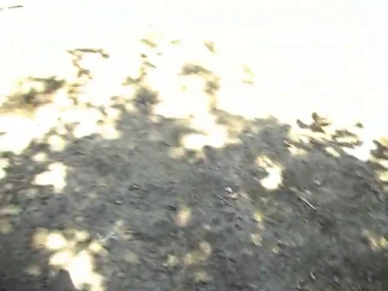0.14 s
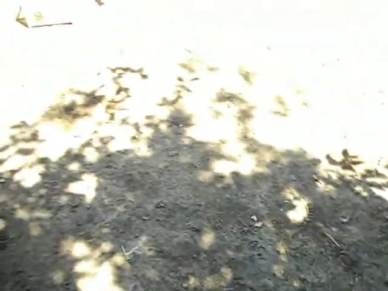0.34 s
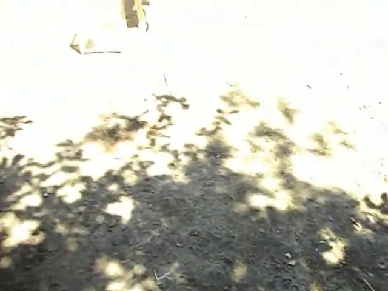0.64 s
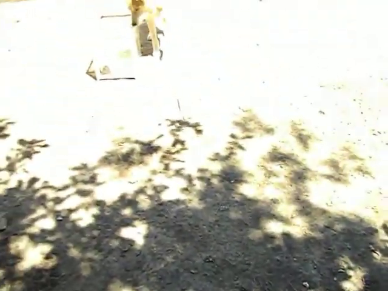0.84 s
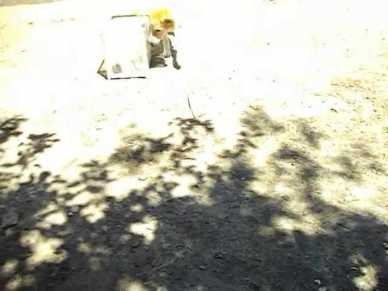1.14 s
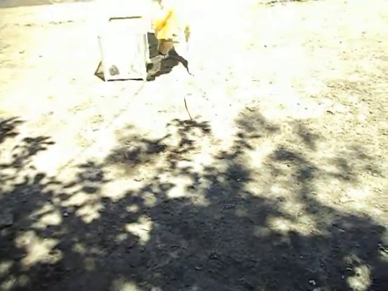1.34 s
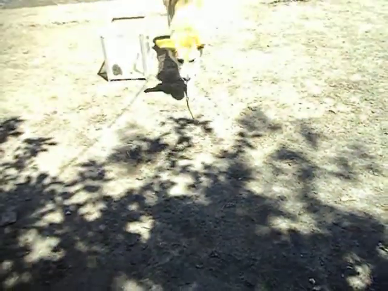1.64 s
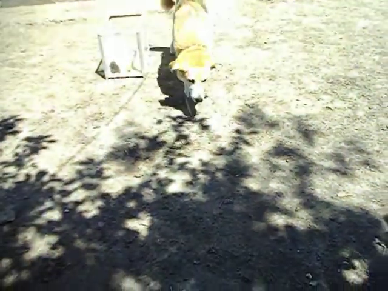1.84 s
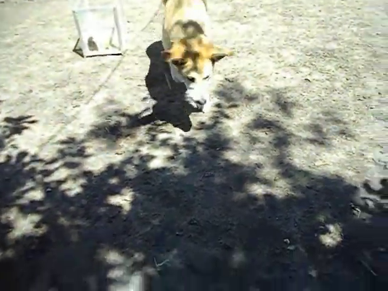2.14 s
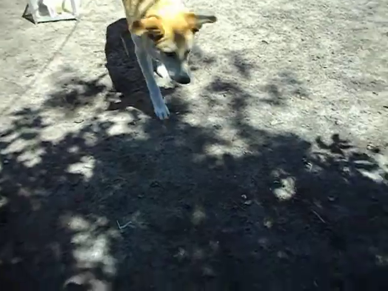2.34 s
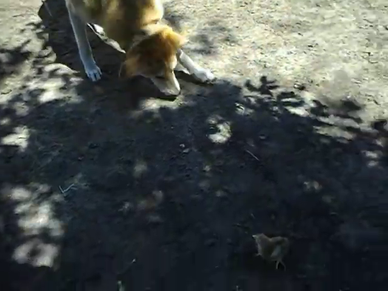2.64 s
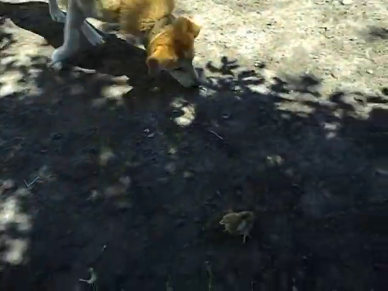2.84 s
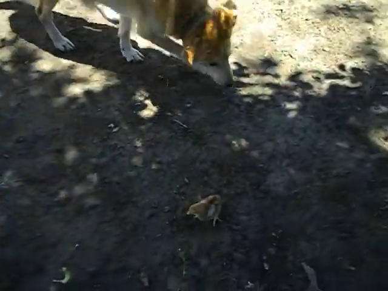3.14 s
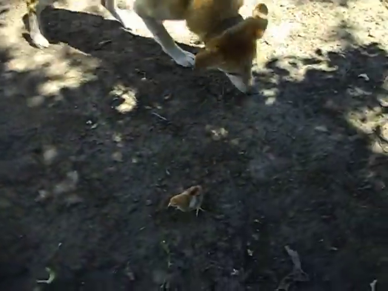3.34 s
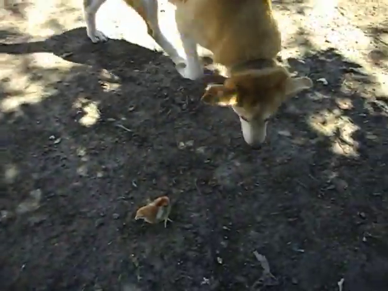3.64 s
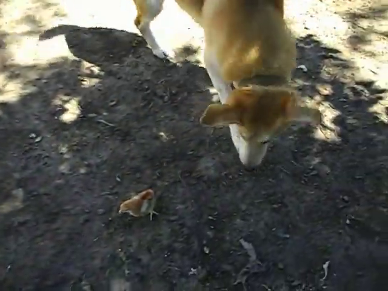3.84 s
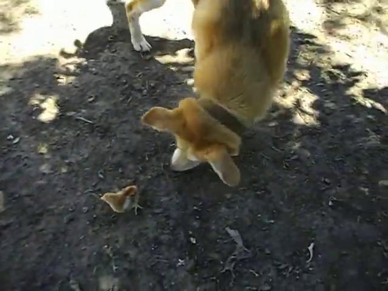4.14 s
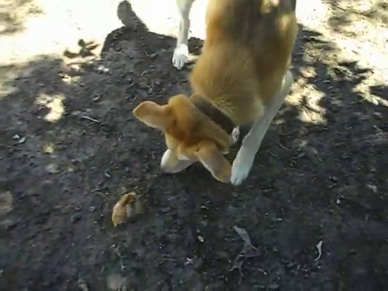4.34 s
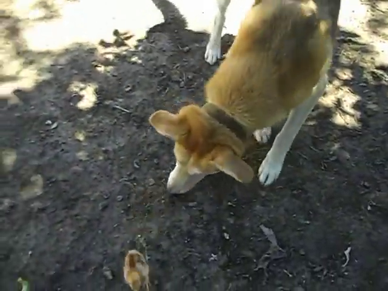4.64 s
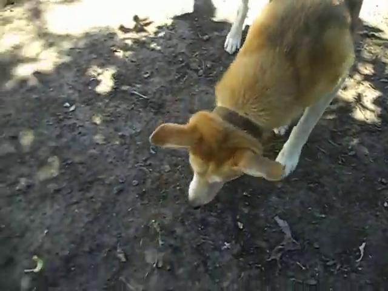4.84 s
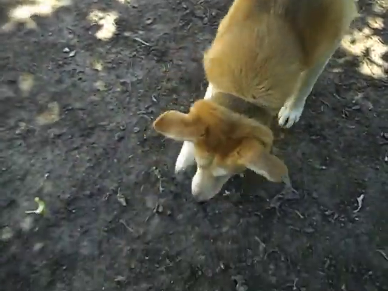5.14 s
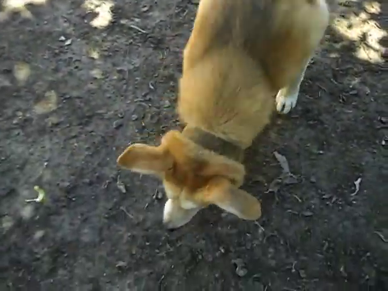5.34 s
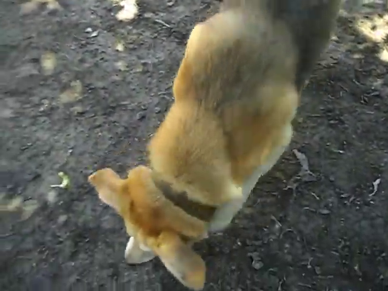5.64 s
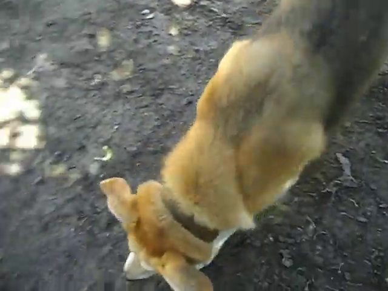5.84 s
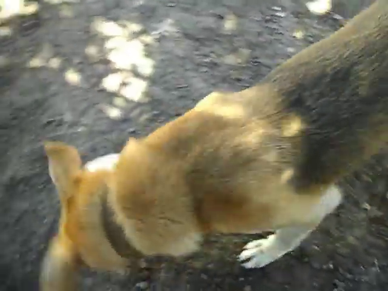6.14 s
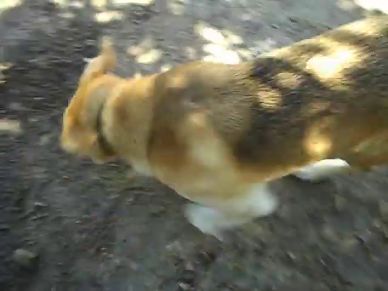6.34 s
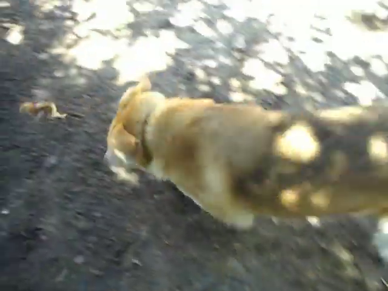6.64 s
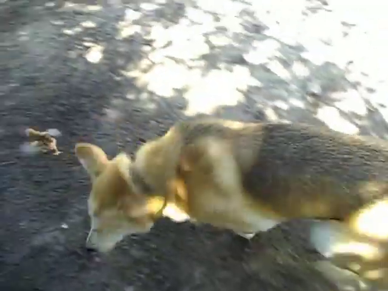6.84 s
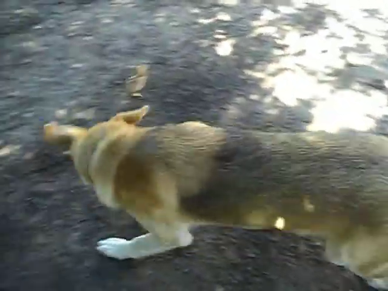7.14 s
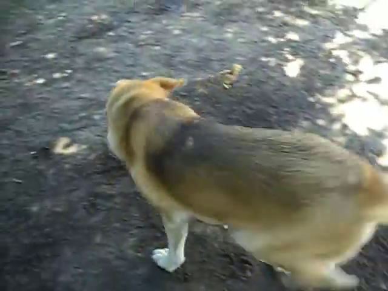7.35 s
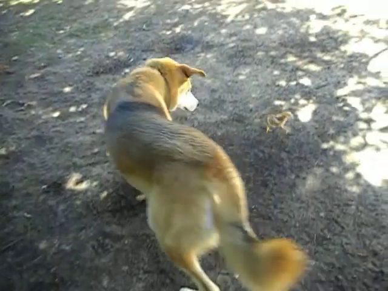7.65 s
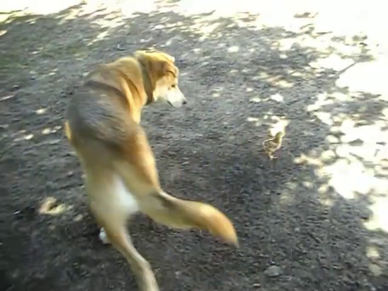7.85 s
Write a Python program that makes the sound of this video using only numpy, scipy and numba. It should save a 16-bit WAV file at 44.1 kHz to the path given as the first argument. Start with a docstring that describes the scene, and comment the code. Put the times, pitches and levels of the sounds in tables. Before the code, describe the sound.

Shrill, falling peeps of a nearby chick repeat steadily outdoors, with a fainter chick, light scuffs and low wind buffeting.

```python
"""On bare ground in a yard a chick peeps close by, and a second chick calls from farther off.
Each peep is a falling whistle from the syrinx with two overtones, often raspy at the top.
Wind buffets the microphone over outdoor hiss, gritty scuffs and ticks, faint chirps and far-off hoots.
The recorder's gain control steps down with small clicks whenever the sound gets too loud."""
import sys
import numpy as np
from scipy import signal
from scipy.fft import rfft, irfft
from scipy.io import wavfile
from scipy.ndimage import uniform_filter1d
from numba import njit

SR = 44100
rng = np.random.default_rng(int(sys.argv[2]) if len(sys.argv) > 2 else 0)


def put_to_file(sound):
    """Save the sound as 16-bit audio at rate SR, in the file named by the first command-line argument."""
    columns = np.atleast_2d(sound).T  # one column per channel
    safe = np.clip(columns, -1, 1)
    whole_steps = np.round(safe * 32767)
    wavfile.write(sys.argv[1], SR, whole_steps.astype(np.int16))


N = 352359
TIME = np.arange(N) / SR


def amp(db):
    """Level in decibels to amplitude ratio."""
    return 10 ** (np.asarray(db) / 20)


def unit(x):
    """Normalisation to rms 1."""
    return x / np.sqrt(np.mean(abs(x) ** 2) + 1e-20)


def read(points, hz):
    """Interpolation of a spectrum on a log-frequency axis."""
    f, value = np.transpose(points)
    return np.interp(np.log(hz + 1), np.log(f), value)


def add(mix, s, sound):
    """Superposition: a sound joins the mix at time s."""
    part = mix[max(round(s * SR), 0):][:len(sound)]
    part += sound[:len(part)]


def coloured(spectrum):
    """Spectral shaping: noise of rms 1 with the given spectrum."""
    gain = amp(read(spectrum, np.fft.rfftfreq(N, 1 / SR)))
    return unit(irfft(rfft(rng.standard_normal(N)) * gain, N))


def band_noise(size, hz, width_hz):
    """Noise of rms 1 in a Gaussian band; centred on 0 Hz it is a random wander."""
    band = np.exp(-.5 * ((np.fft.rfftfreq(size, 1 / SR) - hz) / width_hz) ** 2)
    return unit(irfft(rfft(rng.standard_normal(size)) * band, size))


def low_pass(x, hz):
    """Steep linear-phase low-pass filter."""
    return signal.oaconvolve(x, signal.firwin(511, hz, window=("kaiser", 9), fs=SR), "same")


def outdoor_hiss():
    """Ambient broadband noise, swelling and sinking under slow amplitude modulation."""
    # spectrum of the hiss: f/Hz, relative density/dB
    spectrum = [(120, -39.5), (200, -6), (503, -5.5), (585, -8.5), (1020, -8.5), (1650, -14.5),
                (2690, -13.5), (3230, -5), (3830, 0.5), (6330, -8.5), (7480, -16.5), (9150, -22.5),
                (11000, -27.5), (14300, -68), (22000, -120)]
    # its swell: t/s, relative level/dB
    swell = [(0, -9.5), (.6, -4.5), (2.3, -5.5), (3.0, -13.5), (3.4, -9.5), (3.85, -10), (4.05, -4),
             (4.35, -6.5), (4.8, -6), (5.2, 4), (5.45, -4.5), (6.3, -5), (7.5, -9.5)]
    level_db = -40 + np.interp(TIME, *np.transpose(swell))
    return coloured(spectrum) * amp(level_db + 1.8 * band_noise(N, 0, 12))


def hoots():
    """Far-off hoots: noise in a band narrow enough to have a pitch."""
    # hoots: t/s, level/dB, f/Hz, length/s
    calls = [(3.15, -53, 730, .07), (3.28, -50, 770, .09)]
    out = np.zeros(N)
    for s, db, hz, length in calls:
        size = int(length * SR)
        add(out, s, amp(db) * band_noise(size, hz, width_hz=70) * np.hanning(size))
    return out


def scuffs_and_ticks():
    """Short gritty scuffs, ticks and sharp clicks: noise bursts with exponential decay."""
    # bursts: t/s, level/dB, centre f/Hz, decay time/s
    bursts = [(.804, -40, 1850, .014), (.871, -42, 2010, .0032), (.968, -28, 1600, .0032),
              (1.19, -34, 390, .019), (1.223, -42, 2800, .028), (4.041, -46, 2900, .07),
              (5.553, -50, 1500, .0026), (6.159, -31, 5300, .024), (6.301, -46, 5600, .11),
              (6.352, -25, 1400, .0015), (7.476, -24, 1400, .0018)]
    out, t = np.zeros(N), TIME[:SR // 2]
    for s, db, hz, decay in bursts:
        grit = unit(band_noise(len(t), hz, .32 * hz) * amp(5 * band_noise(len(t), 0, 200)))
        add(out, s, amp(db) * grit * np.exp(-t / decay))
    return out


def wind_strength():
    """Envelopes of rumble and turbulence: gusts superposed on the steady flow."""
    # steady wind: t/s, rumble level/dB, turbulence level/dB
    steady = [(0, -44, -72), (.18, -26, -65), (.47, -27, -67), (.52, -12.5, -45), (.72, -13, -49.5),
              (.83, -33.5, -65), (1.05, -16, -55.5), (1.75, -24, -59), (2.2, -28, -59), (2.9, -32, -62),
              (3.7, -26, -59.5), (4.3, -39, -72), (4.55, -25.5, -62), (5.6, -22, -60), (5.85, -36.5, -68),
              (6.2, -18, -52.5), (6.55, -25, -54), (6.7, -17, -32), (7.0, -8, -17.5), (7.32, -17.5, -29),
              (7.54, -18, -24), (7.63, -39, -69), (7.99, -21, -63)]
    # short gusts: t/s, half width/s, rumble level/dB, turbulence level/dB
    gusts = [(.98, 0.013, -9, -28.5), (1.29, 0.04, -22, -45.5), (1.442, 0.016, -22, -42),
             (1.682, 0.042, -13.5, -44), (1.98, 0.013, -26, -48), (3.05, 0.035, -26.5, -52),
             (3.57, 0.01, -19, -44), (4.752, 0.02, -19, -41), (5.252, 0.054, -11, -41.5),
             (5.431, 0.018, -28, -35), (5.542, 0.028, -19, -31.5), (6.052, 0.018, -15, -45),
             (6.212, .025, -20, -33.5), (6.351, 0.017, -19.5, -31), (6.6, 0.035, -20, -38)]
    s, low_db, mid_db = np.transpose(steady)
    low, mid = amp(np.interp(TIME, s, low_db)), amp(np.interp(TIME, s, mid_db))
    for at, width, rumble_db, turbulence_db in gusts:
        bell = np.hanning(int(4 * width * SR))
        add(low, at - 2 * width, amp(rumble_db) * bell)
        add(mid, at - 2 * width, amp(turbulence_db) * bell)
    return low, mid


def wind(peak_clicks_per_s=90):
    """Turbulent pressure on the microphone; the hardest gusts roar, with small recorder clicks in them."""
    # slow pressure swings: f/Hz, relative density/dB
    rumble_spectrum = [(10, -9.5), (25, 6.5), (50, -3), (80, -10), (130, -24.5), (250, -46.5), (600, -78.5)]
    # eddies: f/Hz, relative density/dB
    eddy_spectrum = [(50, -26), (110, 1.5), (160, -0.5), (250, -7.5), (400, -25.5), (700, -35.5),
                     (1200, -45.5), (2500, -66)]
    # roar of the hardest gusts: f/Hz, relative density/dB
    roar_spectrum = [(100, -22), (230, -3.5), (400, -1.5), (700, -20.5), (1200, -57), (2500, -65)]
    swell, gust = wind_strength()
    rumble = coloured(rumble_spectrum)
    rumble /= np.sqrt(uniform_filter1d(rumble ** 2, size=4000))  # the wind alone sets the slow swell
    force = gust / gust.max()
    eddies = amp(5.5) * coloured(eddy_spectrum) + amp(-1) * force ** .88 * coloured(roar_spectrum)
    lumps = unit(amp(5.5 * band_noise(N, 0, 39)))
    steps = rng.standard_normal(N) * (rng.random(N) < peak_clicks_per_s * force ** 1.6 / SR)
    recorder_clicks = signal.lfilter([1], [1, -np.exp(-2 * np.pi * 600 / SR)], steps)  # each dies away
    return amp(-3) * rumble * swell + eddies * lumps * gust + amp(-21) * recorder_clicks


def buffets():
    """Pressure pulses: each shove of air on the microphone is one Gaussian dip."""
    # shoves of air: t/s, peak level/dB, half width/s
    shoves = [(0.974, 0.5, .006), (1.003, -5.5, 0.014), (1.686, -3.5, 0.0026), (6.352, -3.5, 0.003),
              (6.987, 0.5, 0.0017), (7.021, -0.5, 0.001), (7.105, 1, 0.00063), (7.478, -2.5, 0.0022),
              (7.544, -5.5, 0.002)]
    return -sum(amp(db) * np.exp(-.5 * ((TIME - s) / width) ** 2) for s, db, width in shoves)


def reflections(x, echoes):
    """Specular reflection: the direct sound plus copies (delay/s, level/dB) off hard surfaces."""
    out = x.copy()
    for delay, db in echoes:
        add(out, delay, amp(db) * x)
    return out


def yard_echo(x, t60, early_db, early_t60):
    """Diffuse scattering: a quick cluster from things nearby, then a thin tail from walls and trees."""
    # colour of the scattered sound: f/Hz, gain/dB
    colour = [(1500, -28.5), (2500, 0), (3400, 1), (4200, -12), (5000, -3), (6500, -5.5), (8000, 2),
              (11000, -23)]
    t = TIME[:SR]
    taps = rng.standard_normal(SR) * (rng.random(SR) < .1) * (t > .003)
    taps *= amp(-60 * t / t60) + amp(early_db - 60 * t / early_t60)
    gain = amp(read(colour, np.fft.rfftfreq(SR, 1 / SR)))
    response = irfft(rfft(taps / np.linalg.norm(taps)) * gain, SR)
    return signal.fftconvolve(x, response)[:N]


def peep(rows, rasps, waver, swell_s, rasp_hz=230, rasp_swing=.031, flicker_db=1.6):
    """A gliding tone and two harmonics; rasp is irregular amplitude and frequency modulation."""
    # second harmonic by where it falls: f/Hz, relative level/dB
    second = [(4000, -23), (5200, -5), (6300, -1.5), (7300, -16.5), (8500, -22.5), (9700, -11.5),
              (10300, -26.5), (11000, -40), (12000, -69)]
    # third harmonic by where it falls: f/Hz, relative level/dB
    third = [(5500, -38.5), (7500, -12.5), (8700, -19), (9700, -14), (10300, -29), (11000, -66),
             (12500, -71.5)]
    s, hz, db = np.transpose(rows)
    s = np.sort(s)
    t = np.arange(s[0], s[-1], 1 / SR)
    size = len(t)
    hz, db = (uniform_filter1d(np.interp(t, s, c), size=110, mode="nearest") for c in (hz, db))
    rough = sum((depth * ((t > start) & (t < end)) for start, end, depth in rasps), np.zeros(size))
    rough = uniform_filter1d(np.clip(rough, 0, 1), size=90)
    cycle = np.cumsum(rasp_hz * (1 + .3 * band_noise(size, 0, 100))) / SR % 1
    spurts = unit(np.sin(np.pi * cycle) * np.exp(-2 * cycle))
    flutter = np.sqrt(2) * (1 - rough + rough * spurts) * signal.windows.tukey(size, .04)
    flutter *= amp(flicker_db * band_noise(size, 0, 70.1))
    shake = .003 * band_noise(size, 0, 40.62) + waver * band_noise(size, 0, 170)
    shake += rasp_swing * rough * band_noise(size, 0, 560)
    phase = 2 * np.pi * np.cumsum(hz * (1 + shake)) / SR
    effort = uniform_filter1d(amp(db), size=int(swell_s * SR))  # the overtones swell more evenly
    overtones = amp(read(second, 2 * hz)) * np.sin(2 * phase)
    overtones += amp(read(third, 3 * hz)) * np.sin(3 * phase)
    return s[0], flutter * amp(db) * np.sin(phase), flutter * effort * overtones


def voice(contours, overtone_db, waver, swell_s):
    """Superposition of one voice's peeps; the overtone gain sets their brightness."""
    whistle, overtones = np.zeros((2, N))
    for rows, rasps in contours:
        s, low, high = peep(rows, rasps, waver, swell_s)
        add(whistle, s, low)
        add(overtones, s, high)
    return whistle + amp(overtone_db) * overtones


def faint_chirps():
    """Background chirps: linear downward sweeps under an arched envelope."""
    # sweeps: start t/s, end t/s, start f/Hz, end f/Hz, relative level/dB
    sweeps = [(0.611, 0.657, 4590, 4030, -47), (1.036, 1.12, 3950, 3280, -44),
              (1.517, 1.569, 4040, 3060, -36.5), (3.37, 3.435, 5000, 3300, -53),
              (4.391, 4.481, 5050, 3180, -45)]
    arches = [([(a, top, db - 15), ((a + b) / 2, (top + foot) / 2, db), (b, foot, db - 18)], [])
              for a, b, top, foot, db in sweeps]
    return voice(arches, overtone_db=-6, waver=.03, swell_s=.02)


def far_contour(start, length, foot_hz, db, swell_db, rough):
    """Frequency glide that swells as it sinks, then drops quickly; any rasp is in the first half."""
    top_hz, end_hz, attack_s, drop_s = 5140, 2147, .024, .042
    foot, fall = start + length, foot_hz - top_hz
    rows = [(start, top_hz, db - swell_db - 14),  # t/s, f/Hz, level/dB
            (start + attack_s, top_hz + fall * attack_s / length, db - swell_db),
            (start + .65 * length, top_hz + .62 * fall, db - .46 * swell_db),
            (foot, foot_hz, db),
            (foot + drop_s, end_hz, db - 34.5)]
    return np.array(rows), [(start, start + length / 2, rough)]


def far_chick(pitch_ratio=1.2, fade_db=-11):
    """Biphonation: both sides of the syrinx sound at once, apart in pitch, the second one hoarse."""
    # peeps: t/s, glide length/s, f/Hz at its foot, relative level/dB, swell/dB, roughness (0-1)
    peeps = [(0.093, 0.11, 3864, -28.5, 21.5, 0.06), (.39, 0.14, 3830, -20.5, 31.5, 0.07),
             (.73, 0.14, 3966, -22.5, 11.5, 0.6), (1.085, .13, 3805, -24.5, 14, .4),
             (1.54, 0.12, 3810, -28.5, 15.5, 0), (1.963, 0.11, 3815, -24, 17, 0.06),
             (2.324, .11, 3750, -25, 24, 0.04), (2.721, 0.079, 3946, -34.5, 15, 0.05),
             (3.078, 0.11, 3663, -35.5, 20, 0), (3.431, 0.12, 3680, -34, 16, 0),
             (3.875, .13, 3600, -31.5, 19, 0.08)]
    contours = [far_contour(*row) for row in peeps]
    first = voice(contours, overtone_db=-10, waver=.006, swell_s=.059)
    fading = np.outer(np.linspace(0, 1, len(contours[0][0])), [0, 0, fade_db])  # one note remains
    raised = [(rows * [1, pitch_ratio, 1] + fading, rasps) for rows, rasps in contours]
    second = voice(raised, overtone_db=-19, waver=.018, swell_s=.06)
    return first + amp(-4) * second


def near_contour(start, break_s, drop_s, end, top_hz, low_hz, quaver_hz, notch_hz,
                 attack_s, top_db, break_db, slide_db, tail_db, rough):
    """A held note, a quick break, a diving slide; the ground echo cancels one pitch by interference."""
    # bends of the voice as the chick runs: t/s, half width/s, shift/Hz
    bends = [(5.785, 0.0094, 144), (6.699, .012, -650), (6.819, .006, 248), (7.628, 0.0068, 413)]
    # transmission to the microphone: f/Hz, gain/dB
    carry = [(1700, -1), (2400, -5), (2680, -4), (2950, 0), (3170, -5.5), (3380, 1), (3700, -0.5),
             (5600, -1)]
    break_hz, end_hz, quaver_rate_hz, scoop_hz = 4703, 1684, 18, 218
    t = np.arange(start, end, .001)
    top_s, slide_at = break_s - start, break_s + drop_s
    slide_s = end - slide_at
    sag, drop, slide = (np.clip((t - at) / span, 0, 1)
                        for at, span in [(start, top_s), (break_s, drop_s), (slide_at, slide_s)])
    dive = .53 * slide + .47 * slide ** 5.57  # part straight, part final plunge
    hz = top_hz + (break_hz - top_hz) * sag ** 2.8 + (low_hz - break_hz) * drop + (end_hz - low_hz) * dive
    hz += quaver_hz * (1 - drop) * np.cos(2 * np.pi * quaver_rate_hz * (t - break_s + .0093))
    hz -= scoop_hz * np.exp((start - t) / .01)  # the top note is taken from below
    hz += sum(bend * np.exp(-.5 * ((t - at) / width) ** 2) for at, width, bend in bends)
    stages, levels = np.transpose([
        (start, top_db - 32), (start + attack_s, top_db),  # soft onset
        (break_s - .004, top_db), (break_s + .65 * drop_s, break_db),  # push into the break
        (slide_at + .0053, slide_db), (slide_at + .34 * slide_s, slide_db - 4),  # settle and hold
        (slide_at + .89 * slide_s, tail_db), (end, tail_db - 21)])  # fade and release
    notch_db = -18 * np.exp(-abs(hz / notch_hz - 1) / .017)
    db = np.interp(t, np.maximum.accumulate(stages), levels) + read(carry, hz) + notch_db
    centre, reach = start + .45 * top_s, .6 * rough ** 2 * top_s  # a rougher rasp lasts longer
    return np.transpose([t, hz, db]), [(centre - reach, centre + reach, rough)]


def near_chick():
    """Directivity: the overtones are strongest when the chick faces the microphone."""
    # peeps: start t/s, break t/s, break length/s, end t/s, top f/Hz, f/Hz after the break,
    # quaver depth/Hz, notch f/Hz, attack/s, top, break, slide and tail level/dB, roughness (0-1)
    peeps = [ (.196, .244, .015, .349, 5480, 3774, -2, 2980, 0.0096, -20, 3, -0.5, -14.5, 0.63),
             (1.684, 1.713, .008, 1.828, 5270, 3990, 0.5, 2820, 0.021, -25.5, -2, 0, -9.5, .3),
             (2.045, 2.085, .011, 2.197, 5350, 3893, -1, 3020, 0.015, -18.5, 3.5, 0, -11.5, 0.93),
             (2.399, 2.443, .01, 2.557, 5260, 3923, 6, 2760, 0.012, -13.5, -2.5, -3, -15, 0.69),
             (2.767, 2.816, .022, 2.917, 5400, 3827, 5, 2880, 0.014, -17.5, 0, -6.5, -19, 0.83),
             (3.156, 3.21, .014, 3.31, 5410, 3766, 1, 2430, .014, -22.5, 0.5, -7, -18.5, 0.73),
             (3.6, 3.651, .011, 3.755, 5400, 3846, -15, 2530, 0.011, -20.5, 1, -0.5, -14.5, 0.9),
             (4.131, 4.18, .017, 4.256, 4980, 3527, -3, 2700, 0.037, -7, -7.5, -0.5, -13, 0.05),
             (4.526, 4.583, .017, 4.662, 5144, 3607, -0.5, 4300, 0.016, -8, -2.5, 0, -16.5, 0.52),
             (4.899, 4.96, .021, 5.039, 5090, 3744, -2, 4620, 0.023, 0, -11, 3.5, -7, 0),
             (5.276, 5.336, .019, 5.413, 5115, 3667, 7, 4170, 0.0061, -6, -5.5, 0.5, -16.5, 0),
             (5.692, 5.759, .032, 5.846, 5130, 3730, -1.5, 2050, 0.017, -10.5, -0.5, -9, -10.5, 0.54),
             (6.043, 6.127, .02, 6.196, 5124, 3520, 14.5, 3570, 0.018, -11.5, -19, -5.5, -18, 0.59),
             (6.367, 6.46, .013, 6.521, 5164, 3750, 163, 4550, 0.026, -12.5, -7.5, -8.5, -21.5, 0.67),
             (6.698, 6.814, .024, 6.889, 5610, 3660, 120.5, 5364, 0.01, -14, -12.5, -3, -25, .7),
             (7.094, 7.215, .011, 7.266, 5450, 3520, 228.5, 4500, 0.043, -16.5, -8.5, -6.5, -28.5, .6),
             (7.526, 7.603, .04, 7.679, 5100, 3550, 61, 3820, 0.021, -10, -13, -12.5, -20, 0.6),
             (7.936, 8.02, .015, 8.1, 5200, 3580, -4, 3200, 0.034, -27, 11, 0, -15, 0.86)]
    # how squarely it faces the microphone: t/s, overtone gain/dB
    facing = [(.3, -2), (1.75, -10.5), (2.5, -4.5), (3.7, -5), (4.6, -8.5), (5.3, -12), (6.1, -7.5),
              (6.8, -13), (7.2, -6.5), (7.6, -17)]
    overtone_db = np.interp(TIME, *np.transpose(facing))
    return voice([near_contour(*row) for row in peeps], overtone_db, waver=.00099, swell_s=.064)


def scene():
    """Superposition at one microphone; the far birds have the greater share of reflected sound."""
    near = near_chick()
    near_echo = amp(-19) * yard_echo(near, t60=.55, early_db=14, early_t60=.15)
    near = reflections(near, [(.0045, -23), (.021, -22.5)]) + near_echo
    far = far_chick() + faint_chirps()
    far_echo = amp(-1) * yard_echo(far, t60=.5, early_db=16, early_t60=.11)
    far = reflections(far, [(.007, -9), (.02, -13)]) + far_echo
    background = outdoor_hiss() + wind() + buffets() + scuffs_and_ticks() + hoots()
    return (background + amp(5) * far + near)[None]


@njit
def stepped_gain(x, limit, step, recovery, hold):
    """Feedback gain control: a step down past the limit, at most one per hold, and a steady creep up."""
    out, gain, wait = np.zeros(len(x)), 1.0, 0.0
    for i in range(len(x)):
        wait -= 1
        if i > 0 and abs(out[i - 1]) > limit and wait <= 0:
            gain, wait = gain * step, hold
        gain = min(gain * recovery, 1.0)
        out[i] = x[i] * gain
    return out


def record(dry):
    """Stepping gain control, clipping of the loudest peaks, a treble shelf, then the band limit."""
    drive_db, limit_db, step_db, recovery_db_per_s, hold_s = 1.6, -5.6, -2.1, 22, .0045
    shelf_hz, shelf_db, edge_hz = 11400, -10, 15900
    driven = amp(drive_db) * dry[0]
    held = stepped_gain(driven, amp(limit_db), amp(step_db), amp(recovery_db_per_s / SR), hold_s * SR)
    clipped = np.clip(low_pass(held, shelf_hz), -.74, .74)
    body = low_pass(clipped, shelf_hz)
    return low_pass(body + amp(shelf_db) * (clipped - body), edge_hz)[None]


dry = scene()
out = record(dry)
put_to_file(out)
```